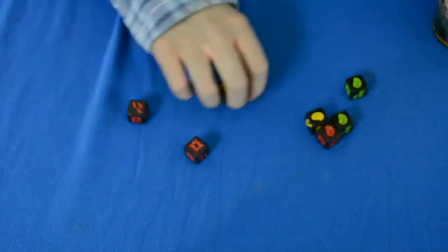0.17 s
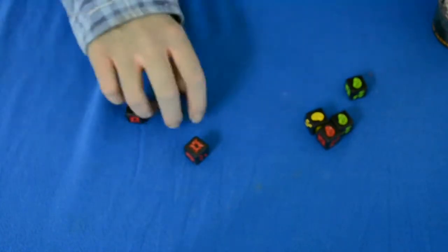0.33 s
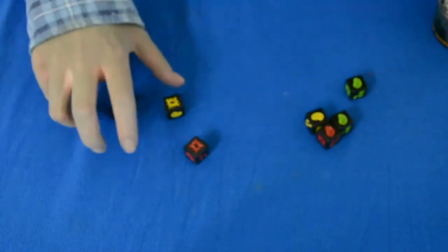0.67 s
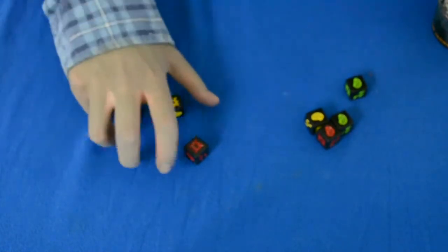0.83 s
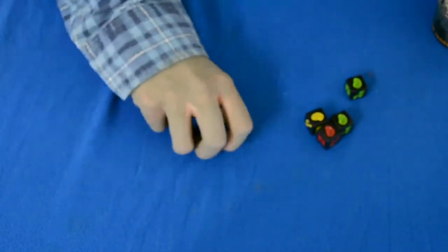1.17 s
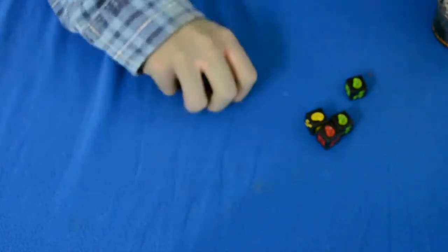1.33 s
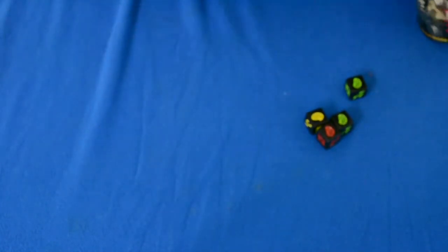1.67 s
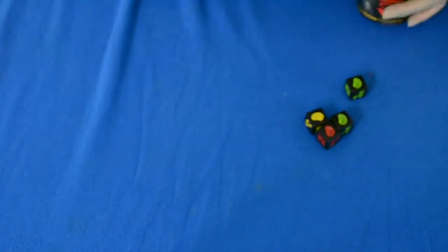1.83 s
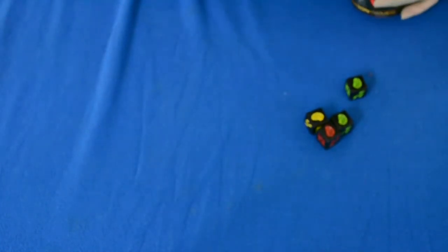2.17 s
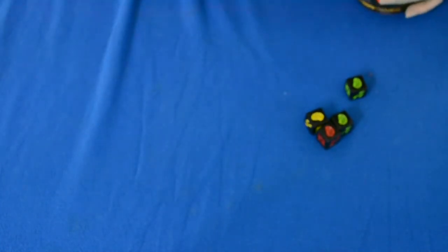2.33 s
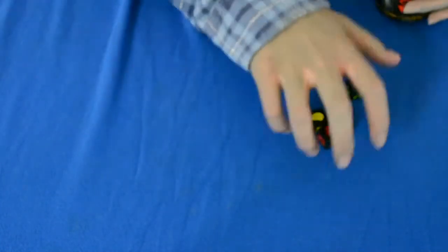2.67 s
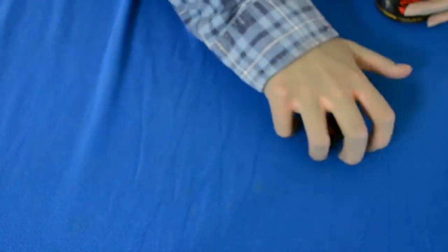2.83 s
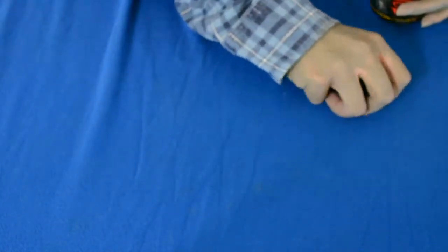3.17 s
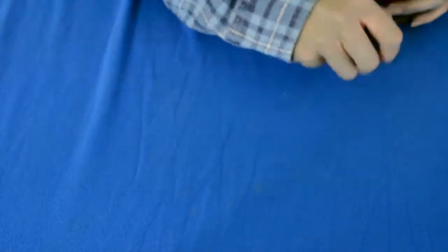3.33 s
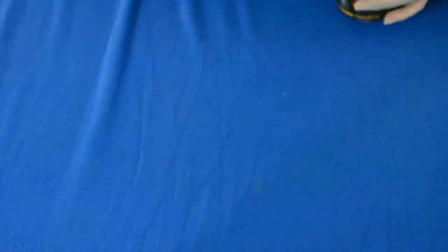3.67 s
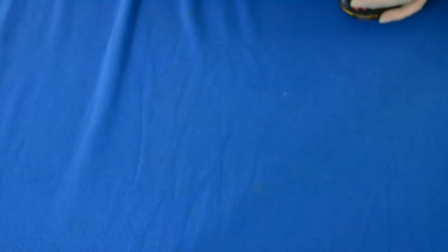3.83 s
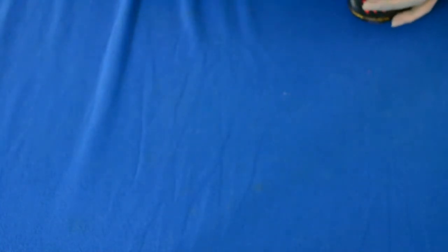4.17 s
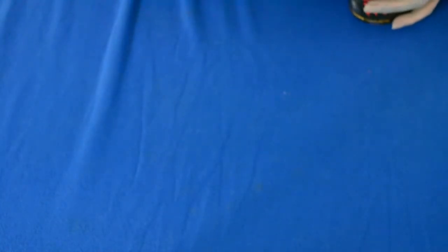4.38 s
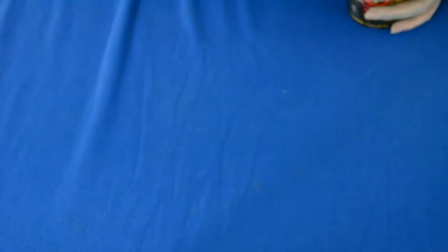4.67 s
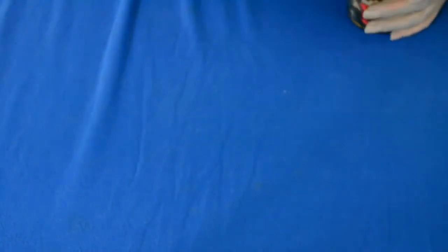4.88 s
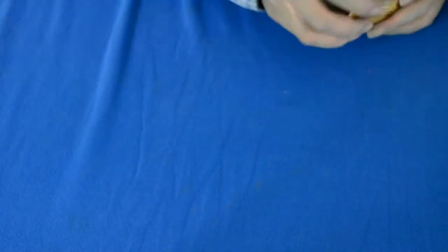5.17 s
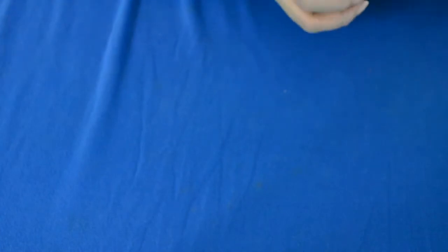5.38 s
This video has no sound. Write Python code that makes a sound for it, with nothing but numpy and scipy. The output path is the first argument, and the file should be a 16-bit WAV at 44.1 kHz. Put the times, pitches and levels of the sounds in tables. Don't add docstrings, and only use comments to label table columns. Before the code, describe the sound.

Two handfuls of dice drop with sharp, hollow rattles into a card cup on a cloth-covered table, close up in a small room.

```python
import sys
import numpy as np
from scipy import signal
from scipy.fft import rfft, irfft, next_fast_len
from scipy.io import wavfile
from scipy.ndimage import uniform_filter1d, map_coordinates

SR = 44100
rng = np.random.default_rng(int(sys.argv[2]) if len(sys.argv) > 2 else 0)


def pcm_store(signal):
    levels = np.round(np.clip(np.atleast_2d(signal), -1, 1) * 32767)
    wavfile.write(sys.argv[1], SR, levels.astype(np.int16).T)


def undo_db(level):
    steps = np.asarray(level, float) / 20
    return 10 ** steps


N = 242842

# f/Hz, level/dB per Hz
ROOM_TONE = [(12, -56.5), (20, -33.5), (133, -15.5), (158, -5), (308, -8), (345, -7.5), (468, -9.5),
             (554, -9.5), (753, -12), (1020, -12), (1510, -14), (1840, -16), (3300, -22), (4490, -24),
             (15800, -36)]
# f/Hz, level/dB per Hz
RUMBLE = [(20, -29), (60, -11.5), (130, -4), (200, -7), (300, -10), (500, -49.5)]
# f/Hz, likeness/1
ALIKE = [(60, 0.85), (180, 1), (550, 0.74), (1650, 0.97), (4970, 0.12), (15000, 0.3)]
# peak t/s, rise t/s, fall t/s, level/dB
CLOTH_STROKES = [
    (1.25, .5, 1.1, -53.5),
    (2.05, 0.081, .12, -59),
    (2.3, 0.074, .1, -60),
    (3.1, 0.27, 0.51, -51),
    (4.55, .05, .3, -63),
    (5.224, 0.18, 0.23, -49.5),
    (5.5, 0.037, .1, -50.5),
]
# peak t/s, rise t/s, fall t/s, level/dB
DRAG_STROKES = [
    (1.706, .07, 0.054, -51),
    (3.114, 0.041, .11, -48),
    (3.47, 0.064, 0.064, -34.5),
]
# f/Hz, level/dB per Hz
WEAVE = [(530, -10), (900, -12), (1010, -7), (1940, -2.5), (2650, -13), (11100, -19), (14700, -25.5),
         (15800, -38.5)]
# f/Hz, level/dB per Hz
DRAG = [(410, -48), (700, -17), (995, -8.5), (1570, -5.5), (1720, -11), (1960, -7.5), (3960, -5),
        (4340, -8.5), (11700, -19), (15800, -44.5)]
# t/s, peak level/dB
THUD = [
    (4.595, -16.5),
]
# f/Hz, t60/s
ROOM = [(300, 0.095), (800, 0.33), (2000, 0.24), (6000, 0.34), (14000, 0.11)]
# delay t/s, t60/s, level re tail/dB
EARLY = (.005, 0.022, 7)
# f/Hz, level/dB
ECHO = [(300, -9.5), (720, -3), (1100, 4.5), (1500, 4.5), (3000, -3.5), (7000, -7), (14000, -1)]
# f/Hz, side re mid level/dB
WIDTH = [(60, -15), (150, -18.5), (380, -27.5), (950, -29), (2380, -34), (5980, -21), (15000, -7)]
# f/Hz, level/dB, t60/s
WALL = [(1500, -5, 0.013), (1569, -5.5, 0.0086), (1809, -7, 0.053), (1954, -6.5, 0.052), (1997, 2, 0.025),
        (2133, 1, 0.019), (2380, -2, 0.02), (2646, -8, .016), (4480, -9, 0.02)]
# f/Hz, level/dB, t60/s
BASE = [(895, 2, 0.031), (1018, 3, 0.027), (1104, -2.5, 0.027), (1186, -3, 0.024), (1273, -1, 0.016)]
# f/Hz, level/dB per Hz
CLICK = [(900, -32), (1600, -4), (2500, 3.5), (4500, 3), (6500, -1), (9500, -2.5), (12500, -10),
         (16000, -31.5)]
# from t/s, to t/s
UNCOVERED = [
    (2.39, 3.4),
    (4.1, 4.9),
]
# t/s, click peak
# level/dB, cup ring re click level/dB, treble level/dB
HAND = [(1.049, -22, -28, -14), (1.078, -31, -25, -17), (1.1448, -31.5, -24, -13), (1.951, -48, -8, -17.5),
        (2.0203, -32, -8, -18.5), (2.0323, -32, -18.5, -19), (2.3315, -21, -25.5, -12),
        (2.9138, -38.5, -5, -13), (3.026, -41, -6, -4.5), (3.0844, -31, -28, -5), (3.098, -35, -26, -3),
        (3.1142, -16.5, -29, -2), (3.3635, -31.5, -18, -20.5), (5.1949, -14.5, -27, -1.5),
        (5.2045, -19.5, -23.5, 1), (5.3676, -39, -20, -19.5), (5.3866, -32, -26, -20.5)]
# t/s, click peak level/dB, then air, base, wall ring re click level/dB
FIRST = [(1.8634, -26, 3, -6.5, -8.5), (1.8744, -42, 1, -10, -14), (1.9044, -51, 9, -16, -15),
         (2.387, -32, 0, -1, 2), (2.4058, -23.5, -10, -7.5, 9), (2.4169, 14, -13, -11, -8.5),
         (2.4314, 2.5, -2, -3.5, -9.5), (2.4384, 2.5, 2, -3.5, -0.5), (2.4664, -6, 6, 3.5, 5),
         (2.4977, -4.5, -10.5, 3, 1.5), (2.5157, -9, -7, 1, -1.5), (2.5282, -5, -10.5, 1, -2.5),
         (2.5526, -5.5, -1.5, -4, -1.5), (2.5644, -13, -5, -13.5, -4), (2.586, -10, -1, -7.5, -11),
         (2.5964, -18.5, -8.5, -8, -11), (2.7217, -10.5, 4, -0.5, -5), (2.7284, -27, 6.5, -3, -5.5),
         (2.7474, -25, -2.5, 5, -2), (2.7584, -27.5, 9, -1, 6), (2.765, -34, 6, 2, 3)]
# t/s, click peak level/dB, then air, base, wall ring re click level/dB
SINGLES = [
    (3.7275, -7, -17, -9.5, -3),
    (3.7346, -16.5, 6, 4, 0.5),
    (3.7658, -14, -5.5, -8, 1),
    (3.7881, -27, -16, -1, 2),
    (3.8302, -26, -7, -7.5, -7),
    (3.8911, -35.5, -1.5, -11.5, -17),
    (3.9361, -38.5, -12.5, -6.5, -4),
    (3.9434, -12, -9.5, -10.5, 2),
    (3.9504, -24.5, 7, -18.5, 0),
]
# t/s, click peak level/dB, then air, base, wall ring re click level/dB
SECOND = [(4.0796, 2.5, -5.5, -9, -3), (4.1004, -7.5, -2, -7.5, -1), (4.139, 9, -5.5, -8.5, -8.5),
          (4.1495, 4, -6, -7.5, -10), (4.1844, 0, 1.5, 1, 5), (4.1944, -11, 5, 0.5, -1),
          (4.2233, 5, -9, -8.5, -1.5), (4.2344, -12, 15.5, -12, -3), (4.2644, -16.5, 13, -9.5, -2),
          (4.2882, -9.5, -8, -20, -10), (4.35, -5, -7.5, -8, -0.5), (4.3535, -2.5, -5.5, -30, -15),
          (4.3604, -6.5, -10.5, -8, -3), (4.4049, -17, -8.5, -3.5, -16.5), (4.4424, -24.5, -4, -17, -3),
          (4.5504, -43.5, 11, 6.5, 5), (4.582, -43, 7.5, 6.5, 3)]
# t/s, click peak level/dB, then air, base, wall ring re click level/dB
LIFT = [
    (5.1625, -24.5, -6, -7, 0.5),
    (5.1951, -14, -6, -2.5, -1),
    (5.2114, -33, -20, -21, -17),
    (5.2565, -29, -6, 2.5, -7),
    (5.3069, -28.5, -7.5, -2.5, -1),
    (5.3244, -43, 5, 7, -7.5),
    (5.469, -30.5, -3.5, 3.5, -4),
    (5.4956, -39.5, 2.5, -12, 9),
]
# start t/s, length t/s, level/dB, fall/dB per s
TUMBLE = [
    (2.423, .19, -14, 118.5),
    (4.085, .05, -19, 3.5),
    (4.137, .205, -10.5, 143),
    (4.354, .097, -20.5, 256),
]
# air, base, wall ring re click level/dB, treble level/dB
ROCK_RING = (-2.5, -12.5, -6, -18)
# f/Hz, level/dB
MIC = [(30, -3.5), (80, 2.5), (11000, -0.5), (13000, -3), (16000, -8)]


def unit(x):
    return x / np.sqrt(np.mean(x ** 2) + 1e-20)


def along(points, hz):
    f, v = np.transpose(points)
    return np.interp(np.log(hz + 1), np.log(f + 1), v)


def filtered(x, response):
    m = next_fast_len(x.shape[-1] + 8192)
    return irfft(rfft(x, m) * response(np.fft.rfftfreq(m, 1 / SR)), m)[..., :x.shape[-1]]


def rush(spectrum, alike, grain_db):
    rough = undo_db(grain_db * unit(uniform_filter1d(rng.standard_normal(N), size=90)))

    def mid_side(hz):
        turn = np.arccos(np.clip(along(alike, hz), -1, 1)) / 2
        return undo_db(along(spectrum, hz)) * np.array([np.cos(turn), np.sin(turn)])

    mid, side = filtered(rough * rng.standard_normal((2, N)), mid_side)
    return unit(np.array([mid + side, mid - side]))


def background():
    swings_per_s = 3.5
    slow = map_coordinates(rng.standard_normal(40), [np.arange(N) * swings_per_s / SR])
    swell = undo_db(-68.5 + 3 * slow)
    return undo_db(-52.5) * rush(ROOM_TONE, ALIKE, grain_db=0.4) + swell * rush(RUMBLE, ALIKE, grain_db=1.5)


def room(x, tail_db, size=2048):
    blocks = np.pad(x, (0, -N % size)).reshape(-1, 1, size)
    hz, t, z = signal.stft(rng.standard_normal((len(blocks), 2, SR // 2)), SR, nperseg=256)
    decay = undo_db(along(ECHO, hz)[:, None] - 60 * t / along(ROOM, hz)[:, None])
    tails = signal.istft(z * decay, SR, nperseg=256)[1]
    delay, t60, early_db = EARLY
    tails *= 1 + undo_db(early_db - 60 * np.arange(tails.shape[-1]) / SR / t60)
    tails *= undo_db(tail_db) / np.linalg.norm(tails, axis=-1, keepdims=True)
    out = np.zeros((2, N + SR))
    for k, piece in enumerate(signal.fftconvolve(blocks, tails, axes=2)):
        start = k * size + round(delay * SR)
        out[:, start:][:, :piece.shape[1]] += piece
    side = filtered(out[1, :N], lambda hz: undo_db(along(WIDTH, hz) + 1.4))
    return out[0, :N] + np.array([side, -side])


def strokes(rows, roundness):
    t = np.arange(N) / SR
    gain = np.zeros(N)
    for s, rise, fall, db in rows:
        away = np.where(t < s, (s - t) / rise, (t - s) / fall)
        gain += undo_db(db - 20 * away ** roundness)
    return gain


def hands_on_cloth():
    near = [(1000, 0.59), (10000, 0.86)]  # f/Hz, left-right likeness
    brush = strokes(CLOTH_STROKES, roundness=0.98) * rush(WEAVE, near, grain_db=2.5)
    drag = strokes(DRAG_STROKES, roundness=2.3) * rush(DRAG, near, grain_db=1.0)
    return brush + drag


def thud():
    out, t = np.zeros(N), np.arange(SR // 8) / SR
    for s, db in THUD:
        body = .6 * np.sin(2 * np.pi * 130 * t)
        body += 1.4 * np.sin(2 * np.pi * 380 * t)
        body += 1.3 * np.sin(2 * np.pi * 560 * t)
        push = undo_db(db - 6 - 60 * t / 0.029) * (1 - np.exp(-t / 0.0032)) ** 2
        out[round(s * SR):][:len(t)] += push * body
        wall = undo_db(db - 24.0 - 60 * t / 0.17) * np.sin(2 * np.pi * 1660 * t)
        out[round((s - .016) * SR):][:len(t)] += wall
    return out


def ring(modes, t, chance):
    total = np.zeros(len(t))
    for (hz, db, t60), (a, b) in zip(modes, chance):
        total += undo_db(db + 2 * a - 60 * t / t60) * np.sin(2 * np.pi * hz * (1 + 0.025 * b) * t)
    return total * (1 - np.exp(-t / 0.00088))


def air_pitch(s):
    covered_hz, open_hz, uncover_s = 662, 784.8, .14
    free = sum(1 - np.exp(-(s - a) / uncover_s) for a, b in UNCOVERED if a < s < b)
    return covered_hz + (open_hz - covered_hz) * free


def click_bursts(treble_db, t):
    def colour(hz):
        tilt = np.clip(np.log2(hz / 4000 + 1e-9), -1.2, 1)
        return undo_db(along(CLICK, hz)) * undo_db((treble_db + 14) * tilt)

    bursts = filtered(rng.standard_normal((len(treble_db), len(t))), colour)
    return bursts * (undo_db(-60 * t / 0.0054) + undo_db(-18 - 60 * t / 0.03)) * (1 - np.exp(-t / 0.00067))


def contacts(rows):
    out, t = np.zeros(N + SR), np.arange(SR // 3) / SR
    rows = np.array(rows)
    bursts = click_bursts(rows[:, 5:], t)
    chance = rng.standard_normal((len(rows), 1 + len(BASE) + len(WALL), 2))
    air_fade = (undo_db(-60 * t / .08) + undo_db(-29 - 60 * t / .5)) * (1 - np.exp(-t / 0.0038))
    for (s, db, air_db, base_db, wall_db, _), burst, c in zip(rows, bursts, chance):
        hz = air_pitch(s) * (1 + 0.018 * c[0])
        air = np.sin(2 * np.pi * hz[:, None] * t).mean(0) * air_fade
        body = undo_db(air_db + 0.5) * air
        body += undo_db(base_db - 6.5) * ring(BASE, t, c[1:])
        body += undo_db(wall_db - 7.0) * ring(WALL, t, c[1 + len(BASE):])
        hit = burst / np.abs(burst).max() + body
        out[round((s + .0008) * SR):][:len(t)] += undo_db(db - 2.0) * hit
    no_bass = signal.butter(4, 440, "high", fs=SR, output="sos")
    return signal.sosfilt(no_bass, out[:N])


def tumbling():
    rows = []
    for start, length, db, fall in TUMBLE:
        u = rng.random((60, 3))[:round(length * 150)]
        after = length * (np.arange(len(u)) + u[:, 0]) / len(u)
        for w, (_, a, b) in zip(after, u):
            level_db = db - fall * w - 4 * np.log(a + 0.11)
            rows.append((start + w, level_db, 8 * b - 8, -1.5, 1.5, -12))
    return rows


def rocking(count):
    gap_s, last_gap_s, shrink = .023, .007, .65
    gaps = last_gap_s + (gap_s - last_gap_s) * shrink ** np.arange(count)
    return [(2.6214 + gaps[:k].sum(), -13 - 2.3 * k, *ROCK_RING) for k in range(count)]


def blows():
    hand = [(s, db, cup, cup, cup, treble) for s, db, cup, treble in HAND]
    cup = [(*row, -16 + 0.0941 * row[1]) for row in FIRST + SINGLES + SECOND + LIFT]
    return hand + cup + rocking(count=8)


def scene():
    dice = contacts(blows()) + contacts(tumbling())
    knock = thud()
    skew = filtered(np.roll(dice, 3), lambda hz: undo_db(along(WIDTH, hz) - 2.0))
    direct = dice + np.array([skew, -skew]) + knock
    echoes = room(dice + undo_db(-6.5) * knock, tail_db=-1.5)
    return direct + echoes + hands_on_cloth() + background()


def top_cut(x):
    return signal.sosfilt(signal.butter(12, 15910, fs=SR, output="sos"), x)


def record(dry):
    coloured = filtered(dry, lambda hz: undo_db(along(MIC, hz)))
    return top_cut(np.clip(coloured, -.99, .99))


dry = scene()
out = record(dry)
pcm_store(out)
```